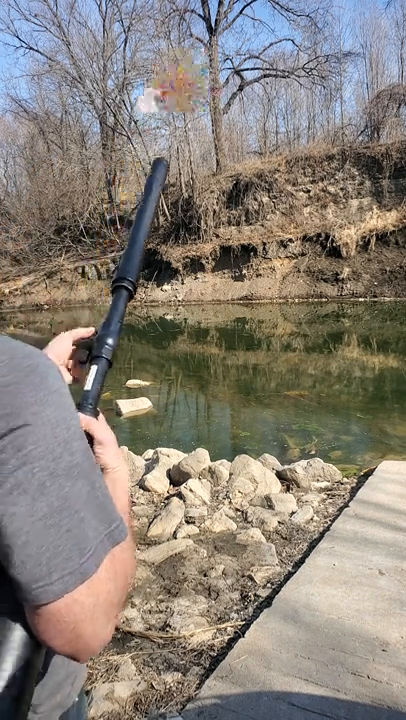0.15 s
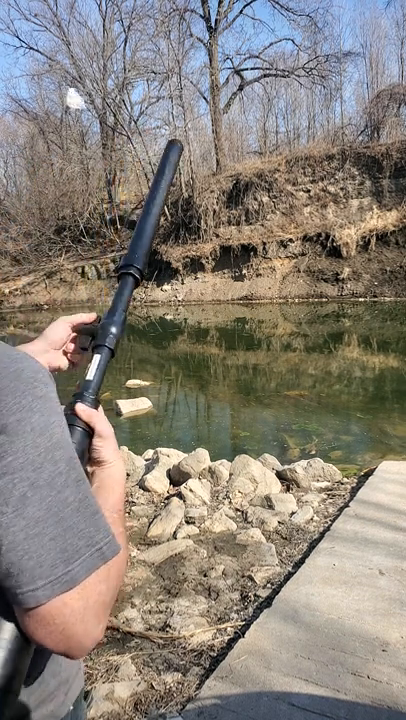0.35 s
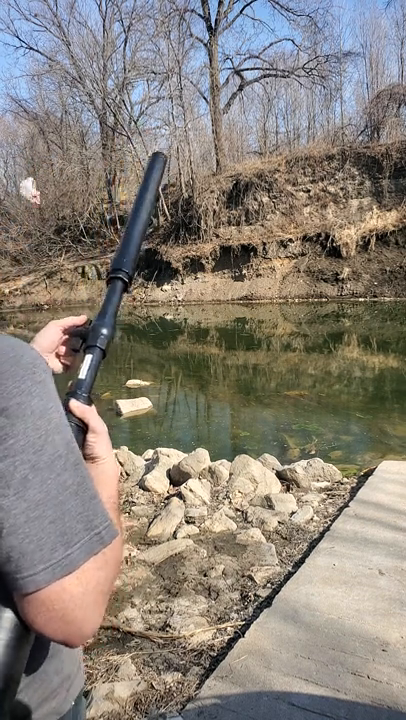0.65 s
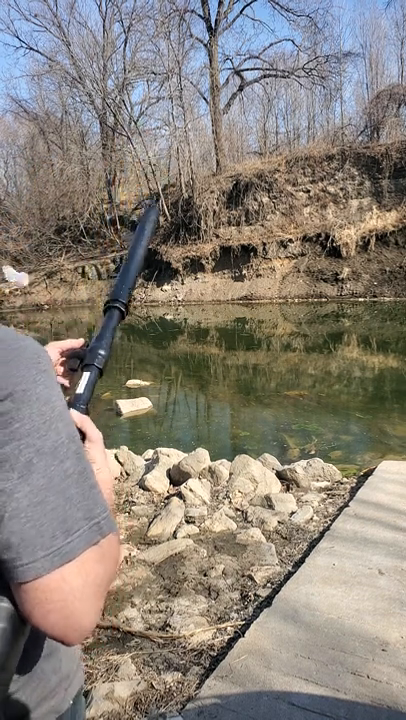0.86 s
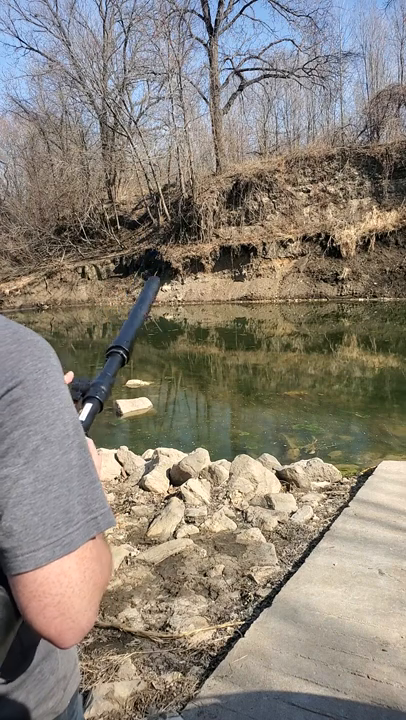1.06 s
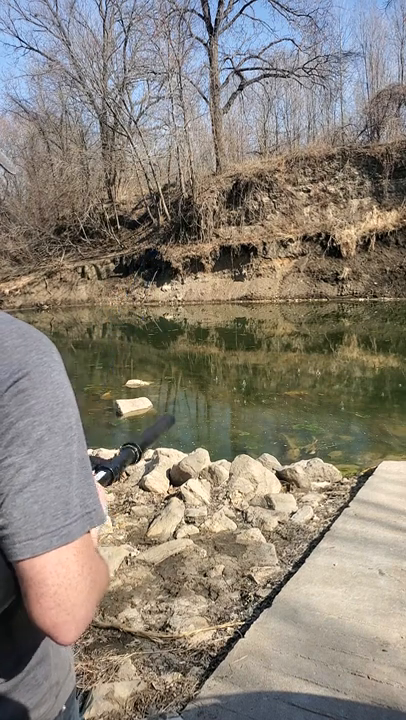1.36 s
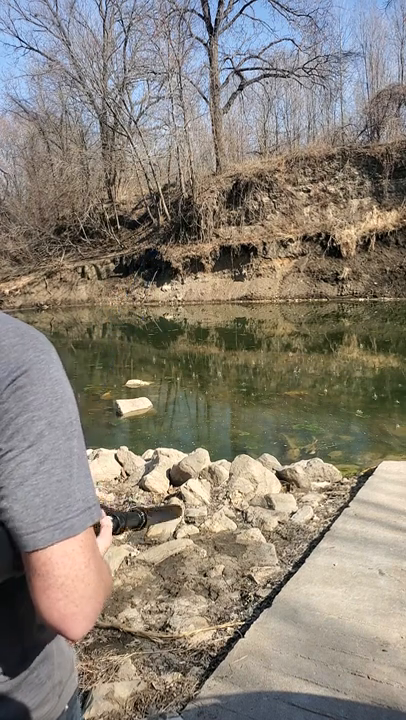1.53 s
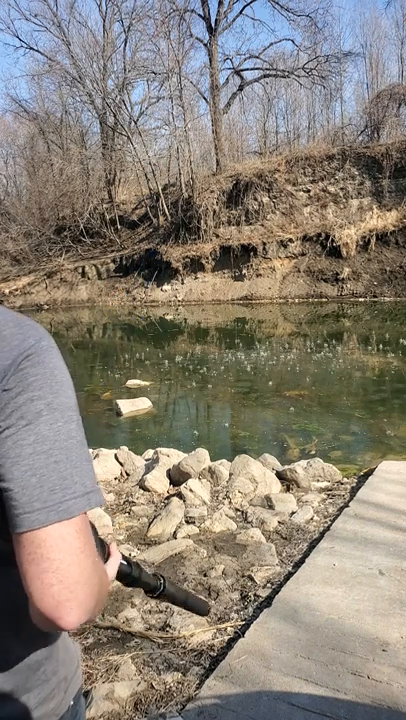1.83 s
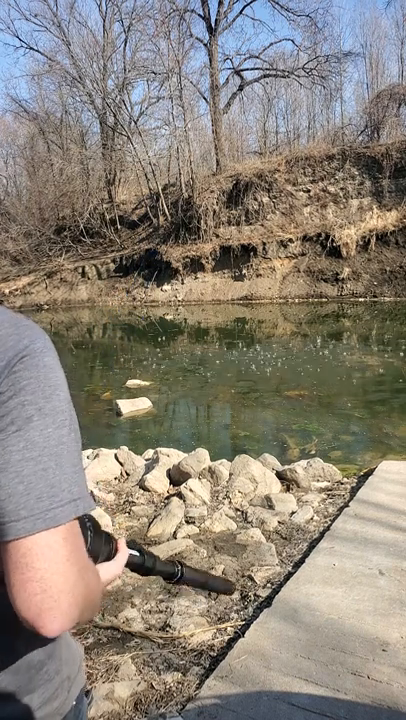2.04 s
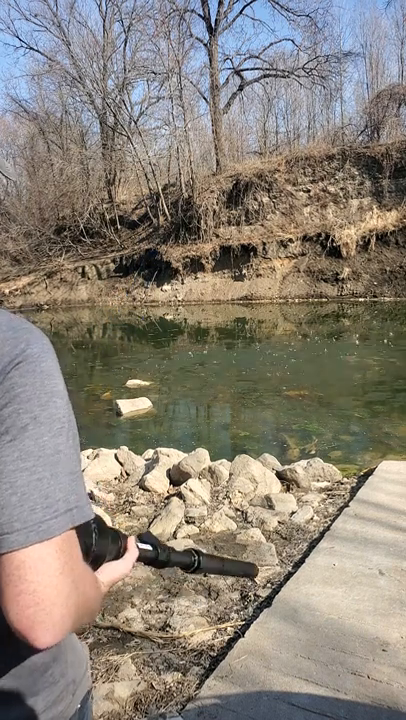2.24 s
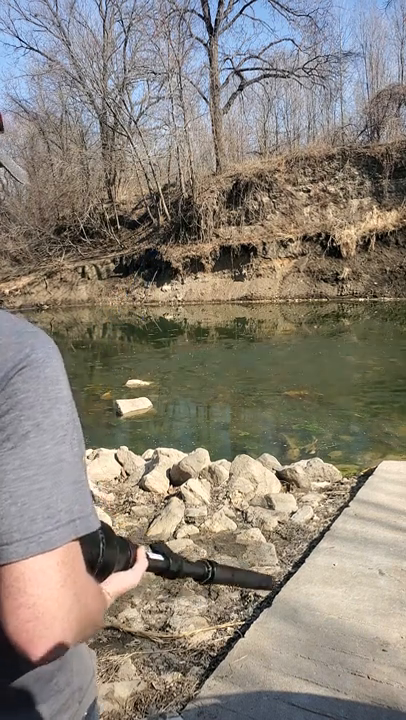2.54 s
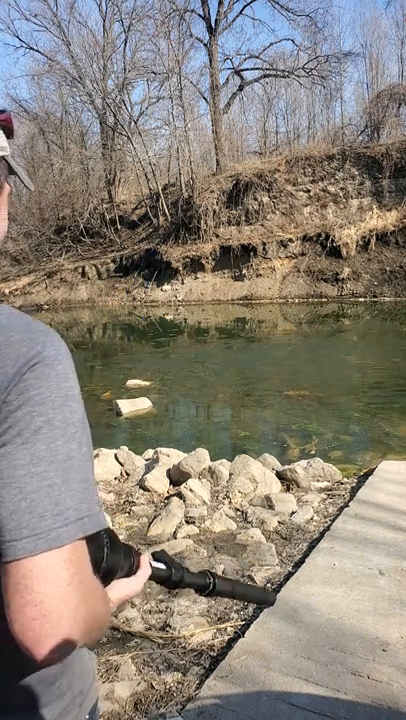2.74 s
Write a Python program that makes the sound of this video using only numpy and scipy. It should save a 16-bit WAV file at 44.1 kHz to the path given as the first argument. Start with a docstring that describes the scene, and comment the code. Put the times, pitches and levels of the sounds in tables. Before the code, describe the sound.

Close stereo microphone outdoors, treble slightly dulled: an air cannon gives a quick raspy blast with a hollow pop and short scatter, then a dense shower of pellets slaps and plinks on water, thinning to drips.

```python
"""A hand-held compressed-air cannon fires over a creek: a low thump as the valve opens, air rasping out of
the barrel with sharp cracks, and a hollow pop as the load leaves, scattered nearby and off the wooded bank.
About a second later pellets slap and plop onto the water as damped rising tones; drops tick, ping and spray.
Outdoors, shaped noise makes a swelling low rumble and a distant rush, with faint wavering whistles far off.
The stereo microphone has two ports that differ in colour, and its treble is cut."""
import sys
import numpy as np
from scipy import signal
from scipy.fft import rfft, irfft, next_fast_len
from scipy.io import wavfile

SR = 44100
rng = np.random.default_rng(int(sys.argv[2]) if len(sys.argv) > 2 else 0)


def put_to_file(sound):
    """Save the sound as 16-bit audio at rate SR, in the file named by the first command-line argument."""
    columns = np.atleast_2d(sound).T  # one column per channel
    safe = np.clip(columns, -1, 1)
    whole_steps = np.round(safe * 32767)
    wavfile.write(sys.argv[1], SR, whole_steps.astype(np.int16))


N = 127449  # length in samples


def amp(db):
    """Decibels to gain."""
    return 10 ** (np.asarray(db) / 20)


def unit(x):
    """Scale to rms 1."""
    return x / np.sqrt(np.mean(x ** 2) + 1e-20)


def clock():
    """The time of each sample in seconds."""
    return np.arange(N) / SR


def along(points, hz):
    """Read a curve of (Hz, value) points on a log frequency axis."""
    point_hz, value = np.transpose(points)
    return np.interp(np.log(hz + 1), np.log(point_hz + 1), value)


def curves(rows):
    """One value per sample for each column after the time."""
    s, *columns = np.transpose(rows)
    return [np.interp(clock(), s, column) for column in columns]


def filtered(x, response):
    """Filter x by a complex response of frequency, padded against wrap-around."""
    size = next_fast_len(N + SR // 2)
    spectrum = rfft(x, size) * response(np.fft.rfftfreq(size, 1 / SR))
    return irfft(spectrum, size)[..., :N]


def coloured(x, spectrum):
    """Filter x through a curve of (Hz, dB) points."""
    return filtered(x, lambda hz: amp(along(spectrum, hz)))


def ports(x, lead_s):
    """Stereo from phase shifts: the left port hears the sound lead_s before the right."""
    sides = np.array([[1], [-1]])
    return filtered(x, lambda hz: np.exp(1j * np.pi * hz * lead_s * sides))


def ring(t, hz, t60, attack_s):
    """A damped sine that starts at t = 0 and falls 60 dB in t60 seconds."""
    t = np.maximum(t, 0)
    return np.sin(2 * np.pi * hz * t) * amp(-60 * t / t60) * (1 - np.exp(-t / attack_s))


def add(track, s, sound):
    """Mix a short sound into a track at time s."""
    part = track[max(round(s * SR), 0):][:len(sound)]
    part += sound[:len(part)]


def snaps(rows, t60):
    """A very short burst of noise for each (s, peak dB) row."""
    out, t = np.zeros(N), np.arange(SR // 20) / SR
    for s, db in rows:
        burst = rng.standard_normal(len(t)) * amp(-60 * t / t60)
        add(out, s, amp(db) * burst / np.abs(burst).max())
    return out


def crackle(per_s, spread_db):
    """Random impulses of uneven size and either sign, rms 1."""
    hit = rng.random(N) < per_s / SR
    sign = np.sign(rng.standard_normal(N))
    size_db = spread_db * np.clip(rng.standard_normal(N), -2, 2)
    return unit(hit * sign * amp(size_db))


# Decay of the scatter before it is stretched. Each row: frequency in Hz, t60 in seconds.
BANK_DECAY = [(100, .55), (1000, .55), (4000, 0.38), (8000, 0.45), (12000, .48), (15000, 0.45)]


def echo(x, stretch):
    """Scatter from rocks, bank and trees: decaying noise, its treble dying sooner than its bass."""
    hz, t, cells = signal.stft(rng.standard_normal((2, SR)), SR, nperseg=256)
    t60 = stretch * along(BANK_DECAY, hz)[:, None]
    tail = signal.istft(cells * amp(-60 * t / t60), SR, nperseg=256)[1]
    return signal.fftconvolve(x, tail / np.linalg.norm(tail[0]), axes=1)[:, :N]


# How alike the outdoors is at the two ports. Each row: frequency in Hz, likeness from 0 to 1.
PORT_LIKENESS = [(100, 0.95), (300, 1), (640, 0.86), (1300, 0.44), (2800, 0.18), (5500, 0.312), (8000, .1)]


def diffuse(spectrum, lead_s):
    """Stereo noise of rms 1, alike in the bass and less so in the treble, as sound from all round."""
    def mid_side(hz):
        angle = np.arccos(np.clip(along(PORT_LIKENESS, hz), -1, 1)) / 2
        return amp(along(spectrum, hz)) * np.array([np.cos(angle), np.sin(angle)])

    mid, side = filtered(rng.standard_normal((2, N)), mid_side)
    return unit(ports(np.array([mid + side, mid - side]), lead_s))


# The outdoors over time. Each row: time in seconds, level of the rumble in dB, level of the distant rush in dB.
BACKGROUND_LEVELS = [(0, -31, -35.5), (.3, -33.5, -40), (.7, -32, -41), (1.1, -33, -40.5),
                     (1.4, -29.5, -39), (1.65, -32, -37.5), (1.85, -29, -35), (2.2, -25.5, -34),
                     (2.55, -26, -34.5), (2.89, -26.5, -34.5)]
# Colour of the low rumble. Each row: frequency in Hz, relative density in dB per Hz.
RUMBLE_COLOUR = [(15, -66), (28, -46.5), (42, -8.5), (62, -9.5), (72, -2), (82, -5.5), (92, -9.5),
                 (108, -11), (130, -27), (200, -33), (400, -84.5)]
# Colour of the distant rush. Each row: frequency in Hz, relative density in dB per Hz.
RUSH_COLOUR = [(60, -6.5), (140, -2.5), (190, 0.5), (235, -4.5), (300, 1), (380, -1), (480, -5),
               (750, -8.5), (1200, -10.5), (1800, -9.5), (2800, -11.5), (3500, -22), (4200, -22.5),
               (4700, -25), (5200, -31.5), (6500, -39), (7300, -51.5), (11500, -51.5), (15500, -65.5)]


def background():
    """A low rumble and a broad distant rush: shaped noise whose levels swell slowly."""
    rumble_db, rush_db = curves(BACKGROUND_LEVELS)
    rumble = amp(rumble_db) * diffuse(RUMBLE_COLOUR, lead_s=.0001)
    rush = amp(rush_db) * diffuse(RUSH_COLOUR, lead_s=.0001)
    return rumble + rush


# Faint whistles far off. Each row: start in seconds, end in seconds, pitch in Hz, rms waver in Hz, level in dB.
WHISTLE_TONES = [(.07, .9, 8140, 110, -82), (.9, 1.36, 8240, 110, -80), (2.07, 2.18, 4880, 45, -64),
                 (2.22, 2.31, 4880, 60, -60), (2.73, 2.95, 6282, 20, -72)]


def whistles(fade_s=0.005):
    """Thin high sines, their pitch wavering with slow noise, barely above the background."""
    t, out = clock(), np.zeros(N)
    for start, end, hz, waver, db in WHISTLE_TONES:
        drift = unit(filtered(rng.standard_normal(N), lambda f: f < 120))
        tone = unit(np.sin(2 * np.pi * np.cumsum(hz + waver * drift) / SR))
        fade = np.clip(np.minimum(t - start, end - t) / fade_s, 0, 1)
        out += amp(db) * tone * fade
    return out


THUMP_S, THUMP_HZ, THUMP_WIDTH_S, THUMP_DB = 0.11, 78, 0.015, -13.5  # centre, pitch, half-width, peak


def recoil():
    """Recoil as the valve opens: a soft low thump, a cosine in a bell-shaped swell, just ahead of the air."""
    t = clock() - THUMP_S
    swell = np.exp(-(t / THUMP_WIDTH_S) ** 2)
    return -amp(THUMP_DB) * np.cos(2 * np.pi * THUMP_HZ * t) * swell


# The air jet over time. Each row: time in seconds, level in dB.
JET_LEVEL = [(.129, -46), (.132, -23), (.137, -17.5), (.142, -15.5), (.148, -18.5), (.157, -17.5),
             (.160, -25), (.165, -23.5), (.169, -20.5), (.172, -27.5), (.178, -22.5), (.187, -20),
             (.196, -21), (.206, -17.5), (.214, -26), (.228, -34), (.25, -54.5), (.3, -71)]
# Colour of the rushing air and its cracks. Each row: frequency in Hz, relative density in dB per Hz.
AIR_COLOUR = [(60, -22.5), (300, -10), (900, -11.5), (1550, -5.5), (2300, -6), (2800, -2.5), (3300, -14),
              (4000, -8.5), (5300, -15.5), (6800, -16.5), (7400, -15), (9000, -16.5), (11500, -12),
              (14000, -16.5), (15700, -16.5)]
# Resonances of the barrel. Each row: frequency in Hz, width in Hz, relative gain in dB.
BARREL_MODES = [(537, 33, -22.5), (970, 25, 5), (1560, 64, -2.5), (1930, 80, -5), (2160, 140, -5.5),
                (2330, 70, 7), (2970, 110, -3.5), (3260, 63, -20), (4000, 55, -11), (5500, 55, -13.5)]
# Cracks in the jet. Each row: time in seconds, relative level in dB.
JET_CRACKS = [(.1452, -14), (.1567, -7.5), (.1678, -15), (.1858, -8), (.1878, -9), (.1944, -14),
              (.2024, -11)]


def jet(grain=1.0, barrel_db=-6, apart=0.87):
    """Crackling air rushes out and rings the barrel; each port hears part of the turbulence alone."""
    def eddies():
        return unit(rng.standard_normal(N) + grain * crackle(per_s=1500, spread_db=4))

    def barrel(f):
        return sum(amp(db) * 1j * f * width / (centre * centre - f * f + 1j * f * width)
                   for centre, width, db in BARREL_MODES)

    level_db, = curves(JET_LEVEL)
    flow = eddies() + apart * np.array([eddies(), eddies()])
    rush = unit(coloured(flow, AIR_COLOUR))
    resonance = unit(filtered(flow, barrel))
    air = unit(rush + amp(barrel_db) * resonance)
    gate = (clock() > JET_LEVEL[0][0]) & (clock() < JET_LEVEL[-1][0])
    # the colour is taken relative to its gain at 5 kHz
    cracks = coloured(snaps(JET_CRACKS, t60=.007), AIR_COLOUR) / amp(along(AIR_COLOUR, 5000))
    return air * amp(level_db) * gate + cracks


# Pops as the load leaves. Each row: time in seconds, relative level in dB.
MUZZLE_POPS = [(.1858, -18), (.1938, -40), (.2018, -11)]
# What each pop rings with. Each row: frequency in Hz, relative level in dB, t60 in seconds.
MUZZLE_MODES = [(152.2, -8, 0.18), (191, -8.5, 0.11), (386, -9.5, 0.04), (532, -3.5, 0.042),
                (630, -1, 0.025), (853, -4, 0.02)]


def muzzle():
    """The load leaves the barrel in hollow pops, each a set of damped sines."""
    t, out = clock(), np.zeros(N)
    for s, pop_db in MUZZLE_POPS:
        for hz, mode_db, t60 in MUZZLE_MODES:
            out += amp(pop_db + mode_db) * ring(t - s, hz, t60, attack_s=0.00035)
    return out


JET_LEAD_S = 0.000332  # the left port hears the barrel first
# Extra colour of the jet at the right port: duller near 2300 Hz, brighter from 10 kHz up.
# Each row: frequency in Hz, gain in dB.
JET_RIGHT_COLOUR = [(1000, 1.5), (1600, 1), (2300, -2.5), (3000, -1), (10000, 3), (12000, 4), (15000, 4.5)]


def cannon(near_db=-7, bank_db=-18, boom_db=-14):
    """Thump, jet and pop, with close scatter from the ground and the far bank's answer."""
    left, right = ports(jet(), JET_LEAD_S)
    air = np.array([left, coloured(right, JET_RIGHT_COLOUR)])
    pop = ports(muzzle(), lead_s=0.000059)
    direct = air + pop + recoil()
    near = amp(near_db) * echo(air, stretch=.06)
    bank = echo(amp(bank_db) * air + amp(boom_db) * pop, stretch=0.81)
    return direct + near + bank


PLOP_RISE = .25  # a cavity's greatest rise in pitch, as a share


def plop(hz, cycles):
    """A small air cavity in the water rings for some cycles, rising in pitch as it closes."""
    t, life = np.arange(SR // 30) / SR, cycles / hz
    # halved, since the phase is this pitch times t
    pitch = hz * (1 + PLOP_RISE * rng.random() * np.minimum(t / life, 1) / 2)
    return ring(t, pitch, life, attack_s=0.077 / hz)


SIZE_SPREAD_DB = 4


def bubbles(per_s, hz, spread, cycles):
    """Cavities of random pitch and size, at a rate that changes with time."""
    out, chance = np.zeros(N), rng.random(N)
    pitch, size = np.clip(rng.standard_normal((2, N)), -1.7, 1.7)
    for i in np.flatnonzero(chance < per_s / SR):
        cavity = plop(hz * np.exp(spread * pitch[i]), cycles)
        add(out, i / SR, amp(SIZE_SPREAD_DB * size[i]) * cavity)
    return out


PLOP_DB, SPLASH_DB, LOUD_PLOP_DB = -37, -39, -.5  # gains
SLAP_DB = 2  # a slap against its plop, before colouring
# The loudest plops and their slaps. Each row: time in seconds, relative level in dB, starting pitch in Hz.
LOUD_PLOPS = [(1.415, -33, 2900), (1.43, -37, 1510), (1.508, -34, 1640), (1.525, -34, 1850),
              (1.573, -33, 1470), (1.611, -22.5, 1590), (1.658, -29, 1640), (1.662, -29, 2890),
              (1.664, -27, 1700), (1.684, -26, 1770), (1.686, -26, 2200), (1.694, -27, 1550),
              (1.706, -27, 1570), (1.729, -23, 1530), (1.739, -27, 1890), (1.745, -32, 2950),
              (1.753, -27, 1530), (1.763, -28, 1660), (1.791, -27, 1490), (1.803, -28, 1850),
              (1.808, -26, 1890), (1.836, -27, 1570), (1.844, -28, 2000), (1.86, -23, 1550),
              (1.897, -25, 1640), (1.899, -31, 3100), (1.906, -31, 2710), (1.916, -31, 2890),
              (1.921, -26, 1420), (1.93, -26, 1590), (1.937, -27, 1640), (1.948, -31, 2760),
              (1.982, -28, 1440), (2.006, -29, 1720), (2.039, -30, 1570), (2.127, -30, 1630),
              (2.147, -28, 1980), (2.184, -29, 1700)]
# A pellet's slap on the water. Each row: frequency in Hz, relative density in dB per Hz.
SLAP_SPECTRUM = [(300, -20), (1300, -1), (2000, 3), (3000, 2), (4000, -8), (7000, -24), (15000, -42)]


def impacts(pellet_rate):
    """Pellets open ringing cavities in the creek; the loudest also slap its surface with a burst of noise."""
    plops = amp(PLOP_DB) * bubbles(pellet_rate, hz=1850, spread=.18, cycles=17)
    plops += amp(SPLASH_DB) * bubbles(pellet_rate, hz=2850, spread=.16, cycles=22)
    for s, db, hz in LOUD_PLOPS:
        add(plops, s, amp(db + LOUD_PLOP_DB) * plop(hz, cycles=22))
    slap_rows = [(s, db) for s, db, hz in LOUD_PLOPS]
    slaps = amp(SLAP_DB) * coloured(snaps(slap_rows, t60=.012), SLAP_SPECTRUM)
    return plops + slaps


SMACK_DB, TICK_DB = -5.5, -57.5  # gains before colouring
# Single pellets that smack the water. Each row: time in seconds, relative level in dB.
PELLET_SMACKS = [(1.208, -62), (1.30, -60), (1.357, -45), (1.39, -50), (1.411, -50), (1.445, -51),
                 (1.478, -51), (1.495, -50), (1.525, -50), (1.556, -48), (1.599, -48), (1.611, -46),
                 (1.642, -43), (1.664, -43), (1.738, -43), (1.785, -44), (1.819, -43), (2.049, -42),
                 (2.11, -45), (2.166, -45), (2.224, -46), (2.27, -32)]
# Colour of ticks, smacks and spray. Each row: frequency in Hz, relative density in dB per Hz.
TICK_SPECTRUM = [(300, -30), (1500, -10), (2800, 6), (3600, 9), (5500, 10.5), (7000, 8), (8000, 12.5),
                 (11500, 9.5), (14200, 11.5), (15700, 10)]


def ticks(drop_rate):
    """Fine drops fall back as tiny high cavities, among pellets that smack the water with noise."""
    drops = bubbles(drop_rate, hz=10400, spread=.25, cycles=14)
    smacks = snaps(PELLET_SMACKS, t60=.013)
    return coloured(amp(TICK_DB) * drops + amp(SMACK_DB) * smacks, TICK_SPECTRUM)


def spray(level_db):
    """A fine hiss of noise, separate at each port."""
    return amp(level_db) * unit(coloured(rng.standard_normal((2, N)), TICK_SPECTRUM))


DRIP_DB = -1  # gain before colouring
# The last drips. Each row: time in seconds, relative level in dB.
LAST_DRIPS = [(2.3146, -45), (2.3594, -51), (2.381, -51), (2.41, -48), (2.4304, -48), (2.4533, -52),
              (2.4714, -53), (2.4843, -51), (2.5022, -52), (2.591, -56)]
# Colour of the drips. Each row: frequency in Hz, relative density in dB per Hz.
DRIP_SPECTRUM = [(1000, -28), (4000, -2), (6300, 15), (8500, 7.5), (11000, -8.5), (15500, -23)]


def drips():
    """The last drips, each a short coloured burst of noise."""
    return amp(DRIP_DB) * coloured(snaps(LAST_DRIPS, t60=0.029), DRIP_SPECTRUM)


WET_DB = -7  # scatter against the direct water
# The shower over time. Each row: time in seconds, rate of plops and of higher splashes (each) per second,
# rate of fine drops per second, level of the spray in dB.
SHOWER_COURSE = [(1.15, 0, 0, -100), (1.3, 8, 0, -84), (1.38, 30, 15, -70), (1.47, 50, 170, -67),
                 (1.58, 100, 700, -62), (1.68, 300, 1400, -57), (1.9, 400, 1700, -55.5),
                 (2.08, 170, 1500, -56), (2.27, 80, 1000, -58), (2.35, 40, 70, -66), (2.5, 15, 5, -73),
                 (2.56, 8, 0, -81), (2.65, 0, 0, -88), (2.89, 0, 0, -92)]


def pellets(ping_db=-50):
    """Pellets slap and plop into the creek; the drops they throw up fall back as ticks, pings and spray."""
    pellet_rate, drop_rate, spray_db = curves(SHOWER_COURSE)
    pings = amp(ping_db) * bubbles(drop_rate / 2, hz=4900, spread=.22, cycles=24)
    water = ports(impacts(pellet_rate) + pings + ticks(drop_rate) + drips(), lead_s=0.0001)
    return water + spray(spray_db) + amp(WET_DB) * echo(water, stretch=0.35)


def scene():
    """The outdoors, the shot and the shower."""
    return background() + whistles() + cannon() + pellets()


TOP_HZ = 15780  # middle of the treble cut
# The right port against the left. Each row: frequency in Hz, gain in dB.
RIGHT_PORT_COLOUR = [(100, 2.5), (300, 1.4), (1000, 3), (1600, 4.5), (2300, -1), (2850, 0), (3500, 4),
                     (4200, 7), (5200, 9), (6300, 9.5), (7000, 5.5), (7450, -5), (8100, -21), (9000, -12),
                     (10000, -4), (11300, 0), (12500, -3), (13900, -12), (15500, -17)]


def record(dry, ceiling=0.8):
    """The microphone's right port colours the sound; peaks are rounded off and the top is cut."""
    x = np.array([dry[0], coloured(dry[1], RIGHT_PORT_COLOUR)])
    x = x / (1 + (x / ceiling) ** 4) ** (1 / 4)
    return filtered(x, lambda hz: np.clip((TOP_HZ - hz) / 200 + .5, 0, 1))


dry = scene()
out = record(dry)
put_to_file(out)
```